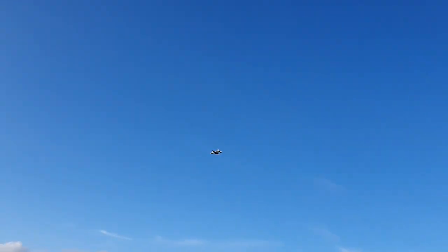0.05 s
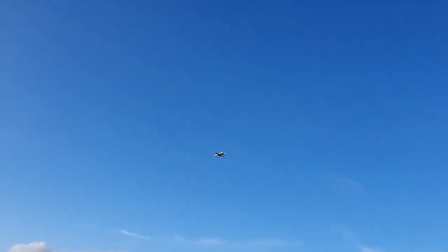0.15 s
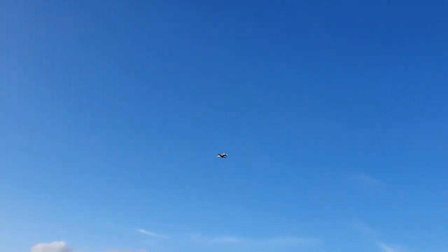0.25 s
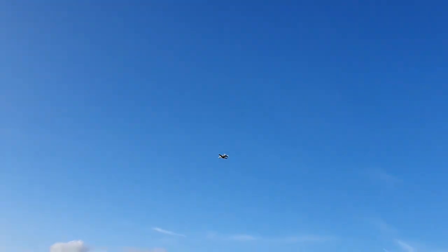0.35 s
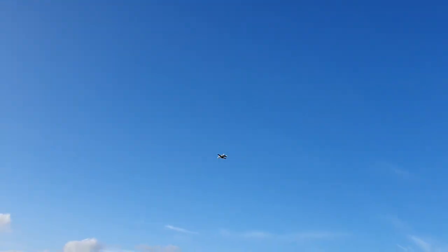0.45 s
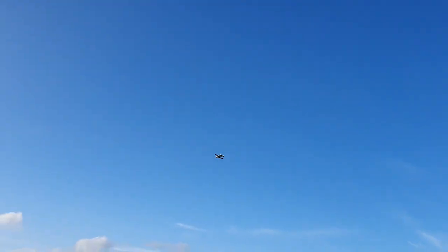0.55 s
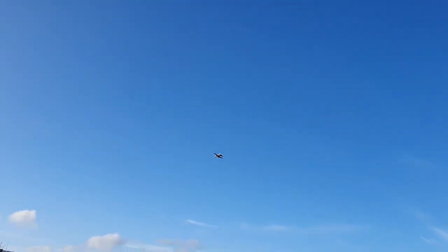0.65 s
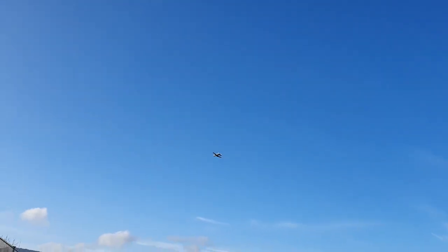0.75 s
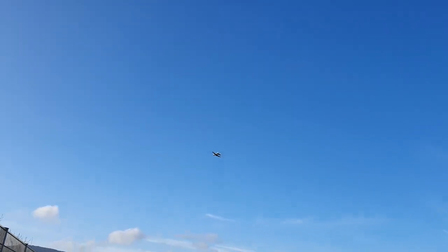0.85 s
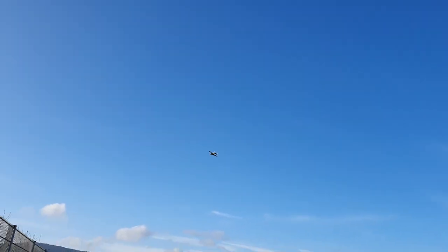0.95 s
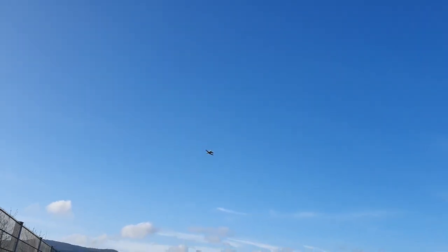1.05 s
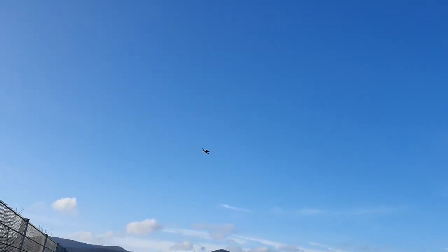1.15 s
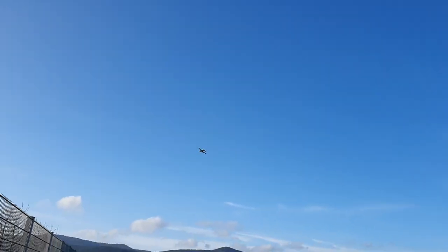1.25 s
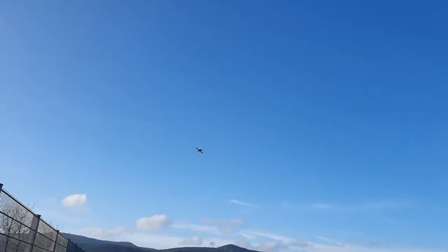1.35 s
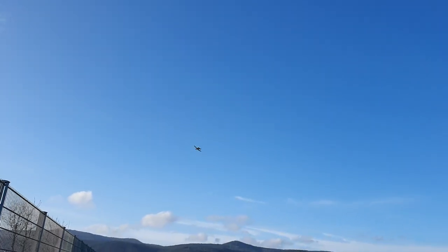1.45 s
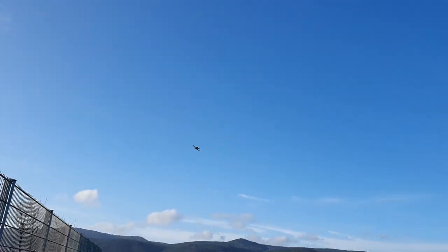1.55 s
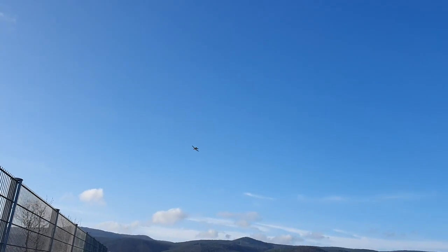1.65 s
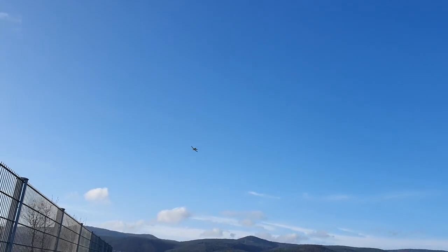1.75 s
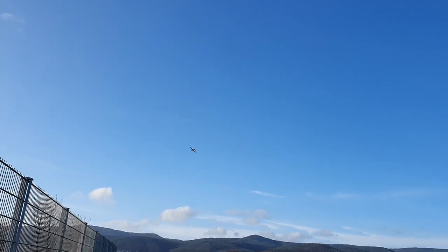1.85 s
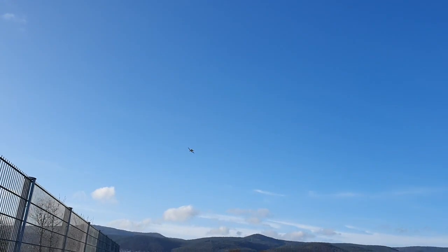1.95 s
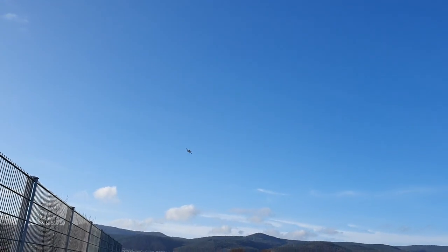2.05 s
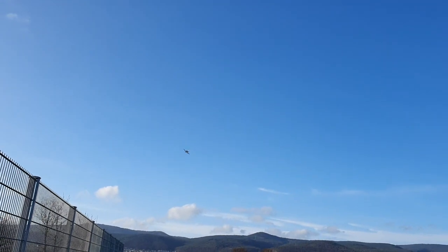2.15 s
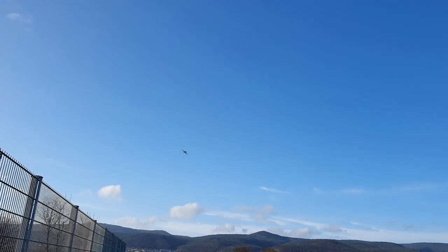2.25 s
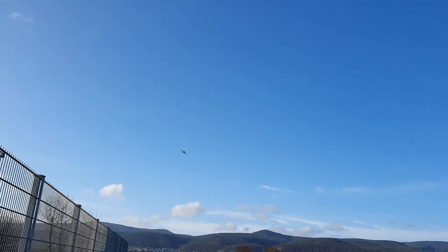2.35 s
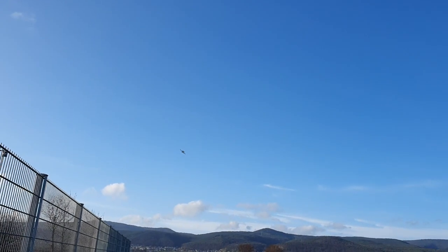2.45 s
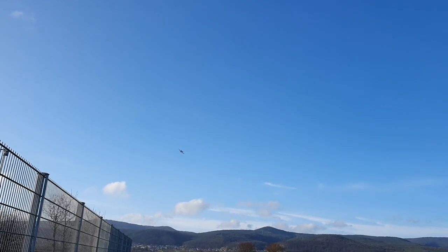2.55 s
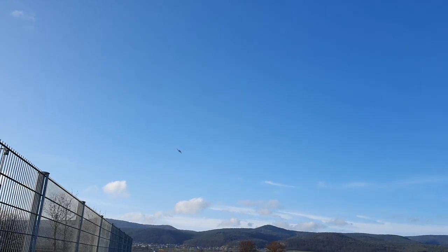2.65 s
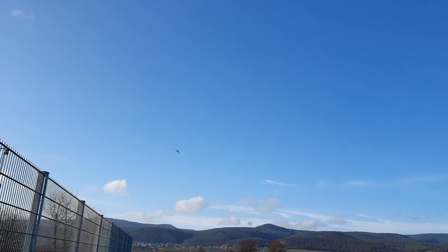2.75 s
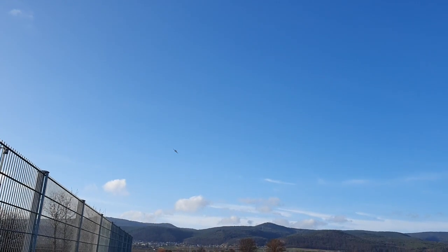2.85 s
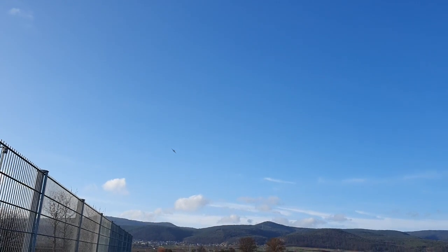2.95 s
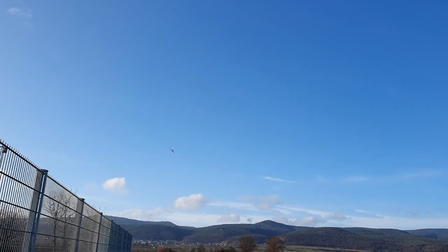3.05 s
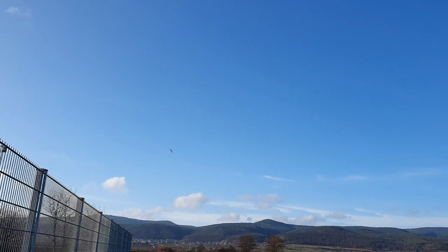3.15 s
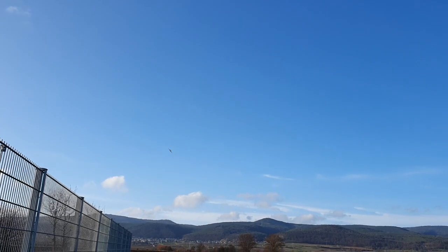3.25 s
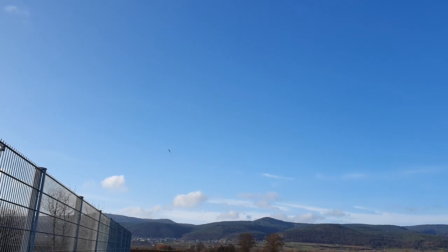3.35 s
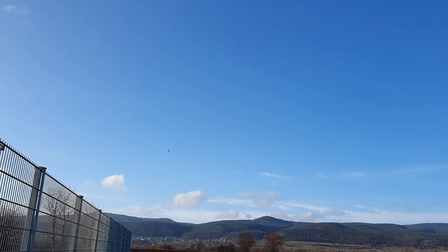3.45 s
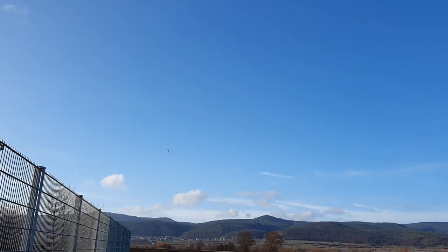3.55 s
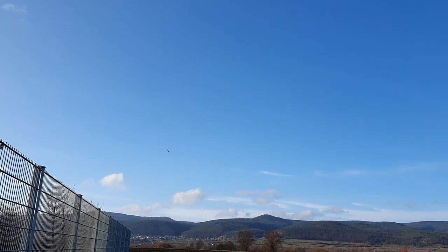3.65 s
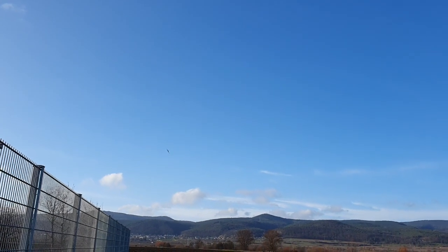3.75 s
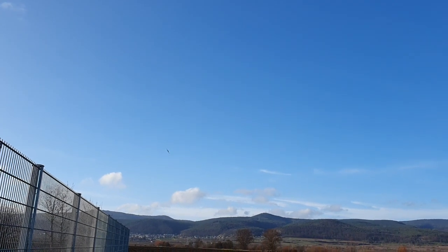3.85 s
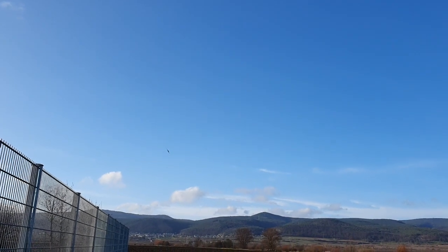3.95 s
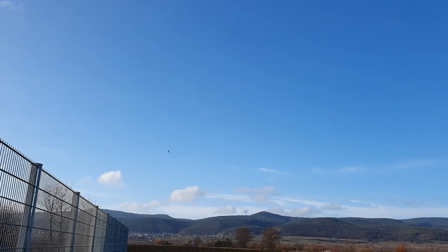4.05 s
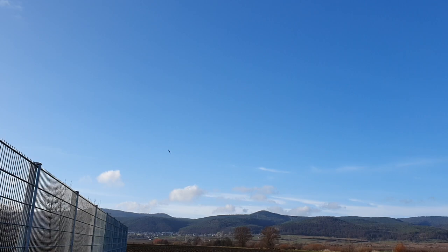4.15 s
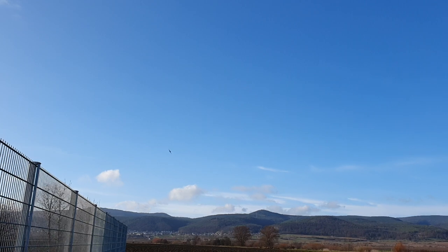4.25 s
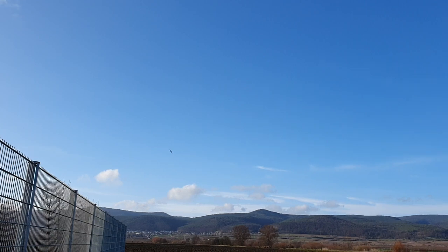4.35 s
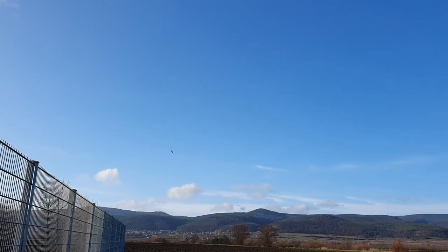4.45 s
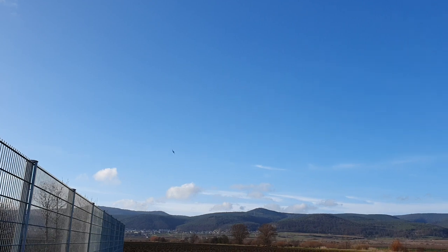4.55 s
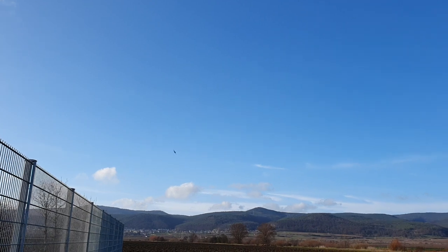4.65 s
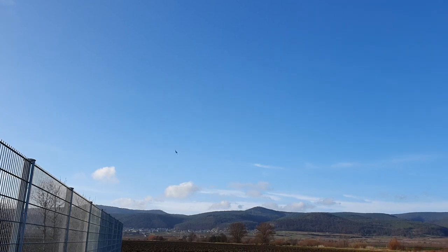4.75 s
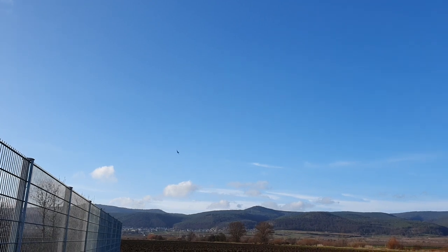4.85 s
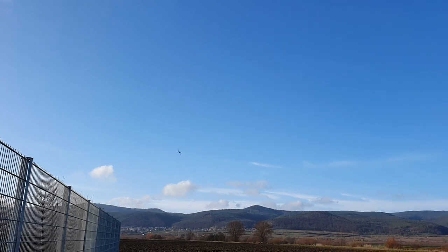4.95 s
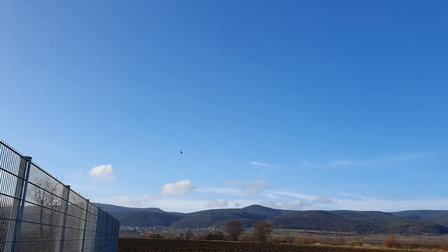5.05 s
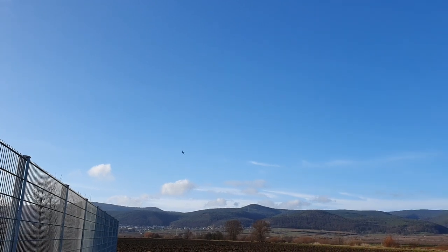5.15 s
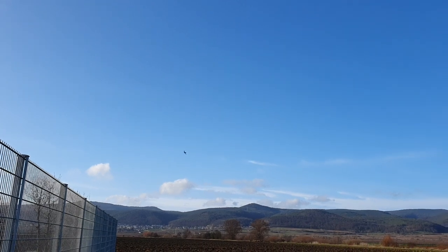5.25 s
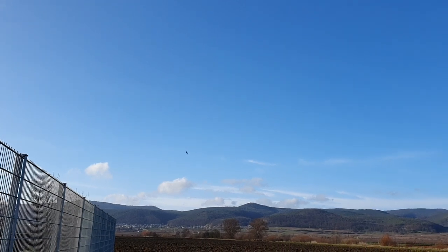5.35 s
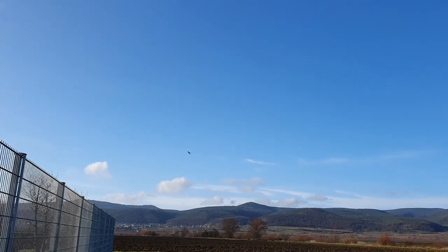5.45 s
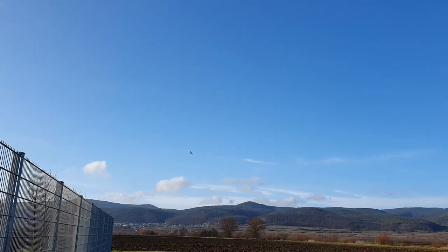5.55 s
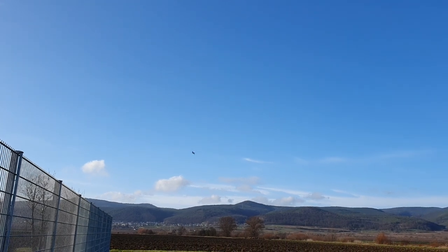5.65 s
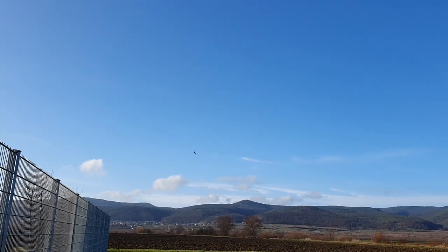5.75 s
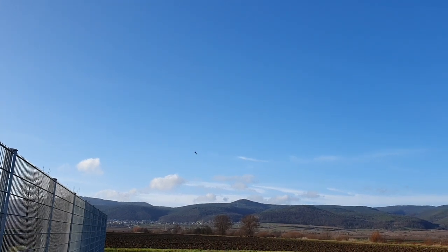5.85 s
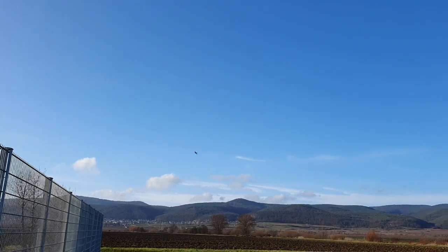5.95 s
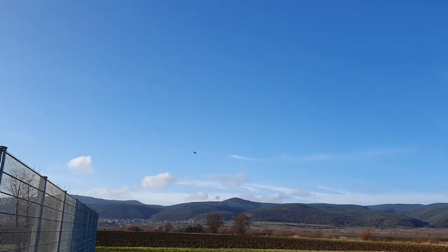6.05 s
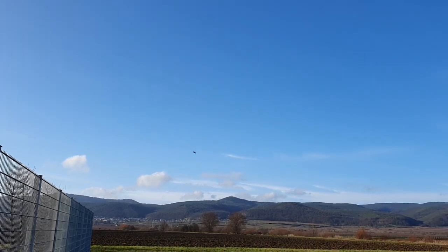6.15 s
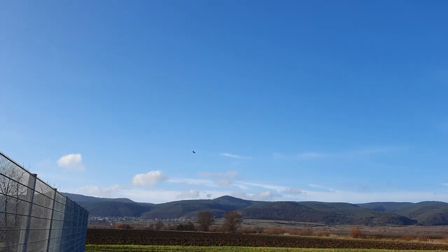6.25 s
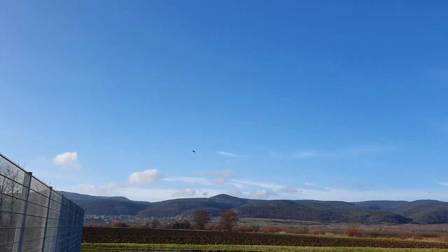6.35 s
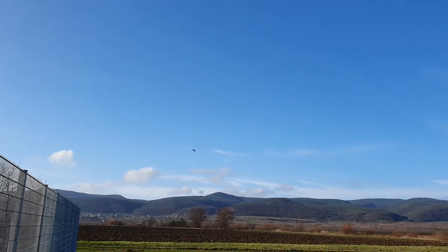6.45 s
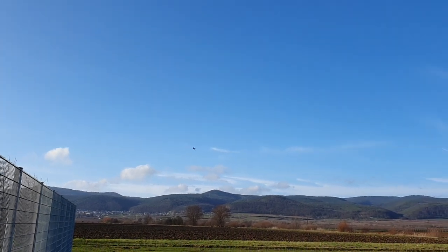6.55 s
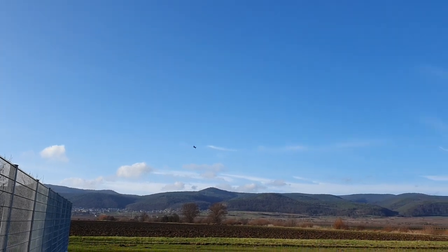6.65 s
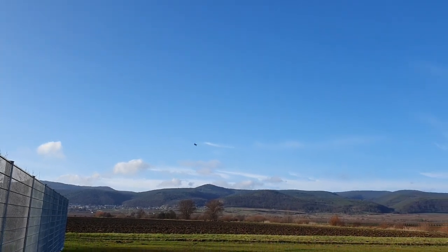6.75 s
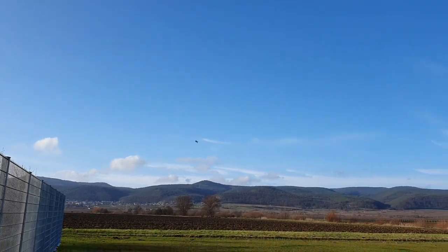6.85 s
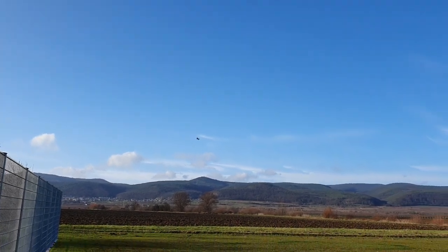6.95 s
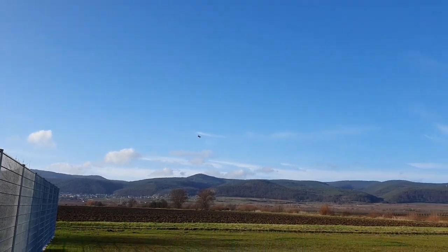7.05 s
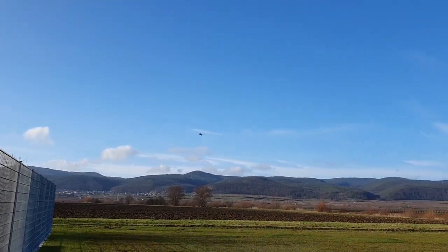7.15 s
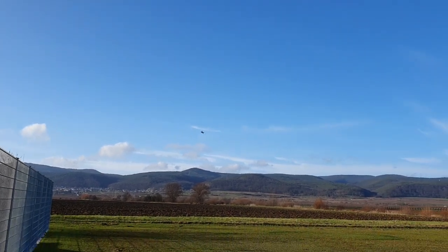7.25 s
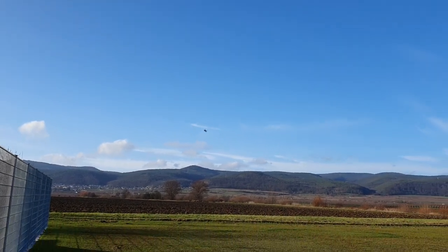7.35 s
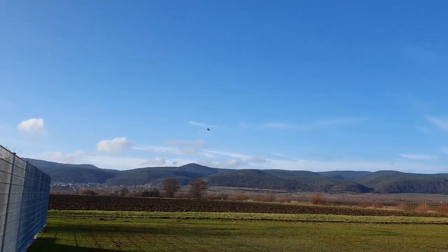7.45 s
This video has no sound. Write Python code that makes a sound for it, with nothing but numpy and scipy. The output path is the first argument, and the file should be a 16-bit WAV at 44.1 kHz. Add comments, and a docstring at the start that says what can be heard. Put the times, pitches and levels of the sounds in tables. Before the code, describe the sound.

From the start, a model jet's turbines make a hollow, rushing roar in the open air, loudest and brightest during the first second. As it flies away, a phasing tone sweeps steadily upward through the noise, quickly at first and then more slowly, while faint, narrow howls swell and sink. The hiss drains away between about 1 and 4 seconds, and the roar is dull and weaker by 5. It swells again from roughly 5.3 to 6.3 seconds, then recedes, with brief, thin whistling surges around 6.6 to 7.2, still audible at the end at 7.5.

Wind buffets the microphone throughout with a low rumble and short, irregular thumps. A sleeve swishes very softly close by, slightly to the right, from about 5.8 to 6.8 seconds. Underneath are a steady countryside hush and the faint, low hum of a distant engine.

```python
"""A hollow roar sweeps upward in pitch and dulls as a twin-turbine model jet flies away low over fields.
Its turbulent exhaust noise arrives directly and off the ground; the lag between the two shrinks, so their
interference comb rises, while the air absorbs the treble. Wind buffets the two microphone ports,
a sleeve swishes near the end, and a far engine hums in the hush of open country."""
import sys
import numpy as np
from scipy import signal
from scipy.fft import rfft, irfft, next_fast_len
from scipy.io import wavfile
from scipy.ndimage import uniform_filter1d, map_coordinates

SR = 44100
rng = np.random.default_rng(int(sys.argv[2]) if len(sys.argv) > 2 else 0)


def generate_wav(signal):
    """Clip the signal to [-1, 1] and save it as 16-bit WAV at the path in sys.argv[1]."""
    frames = np.transpose(np.atleast_2d(signal))
    scaled = np.clip(frames, -1, 1) * 32767
    pcm = np.round(scaled).astype(np.int16)
    wavfile.write(sys.argv[1], SR, pcm)


N = 331191
TIME = np.arange(N) / SR

# path differences set by the jet's bearing: time_s, left_port_lead_ms, holder_echo_lag_ms
BEARING = [(0, -.01, 1.24), (1, .008, 1.31), (2, .04, 1.35), (3, .07, 1.38), (4.5, .09, 1.41),
           (7.51, .095, 1.41)]


def jet():
    """Turbulent mixing radiates broadband noise, which reaches the ports directly and by scattering."""
    # exhaust spectrum: frequency_hz, relative_density_db
    exhaust_spectrum = [(130, -12), (300, -6), (400, -5.5), (490, -1.5), (620, -4), (850, -0.5), (1150, -5),
                        (1400, -2.5), (2200, -4.5), (2750, -16), (4400, -23), (5250, -24), (6400, -24.5),
                        (7600, -35.5), (11300, -38.5), (13500, -52.5), (15000, -67)]
    # scattering by the air and the field: frequency_hz, diffuse_to_direct_db
    scatter = [(200, -14), (500, -17), (1000, -15), (2350, -10.5), (2750, -2), (3100, 5), (3600, -3),
               (4400, -5), (5200, -2), (6100, -6.5), (7000, -4), (12000, 2)]
    exhaust = through_air(noise(exhaust_spectrum, channels=3))
    direct, diffuse = exhaust[:1], exhaust[1:]
    lead_ms = curves(BEARING)[0]
    pair = np.vstack([delayed(direct, -lead_ms / 2), delayed(direct, lead_ms / 2)])
    pair = pair + filtered(diffuse, lambda hz: amp(along(scatter, hz)))
    roar = receding(port_response(echoes(pair)))
    return howling(ground_bounce(roar)) * amp(-1.41 + 0.24 * wobble(14))


def through_air(x, knee_hz=5200, absorption_db_per_s=7.0, deepens_until_s=4.5):
    """Refraction by eddies focuses patches of noise; absorption above the knee grows with the path."""
    # focusing, strongest for short waves: frequency_hz, depth_db
    focusing = [(400, .8), (1400, 1.5), (4000, 2.6), (9000, 2)]
    hz, t, spectra = signal.stft(x, SR, nperseg=1024)
    eddies = uniform_filter1d(rng.standard_normal(spectra.shape[1:]), size=3, axis=0)
    eddies = unit(uniform_filter1d(eddies, size=8, axis=1))
    focus_db = along(focusing, hz)[:, None] * eddies
    above_knee = np.maximum(hz / knee_hz - 1, 0)[:, None]
    loss_db = absorption_db_per_s * above_knee * np.minimum(t, deepens_until_s)
    return signal.istft(spectra * amp(focus_db - loss_db), nperseg=1024)[1][:, :N]


def echoes(x, wing_share=0.11, holder_share=0.11):
    """Comb filtering: faint, very short reflections off the wing and camera holder colour the noise."""
    # reflection off the wing as the jet banks: time_s, lag_ms
    wing_echo = [(0, 0.46), (2.8, 0.47), (4.6, 0.4), (6, 0.56), (7, 0.856), (7.51, 0.72)]
    wing_ms = curves(wing_echo)[0]
    holder_ms = curves(BEARING)[1]
    x = x + wing_share * delayed(x, wing_ms)
    return x + holder_share * delayed(x, holder_ms)


def port_response(pair):
    """Resonance: the camera case lifts a few bands, and its two ports differ in level and phase."""
    # case resonances: centre_hz, width_hz, boost_db
    case_modes = [(1752, 80, 3), (3666, 550, 4.5), (4270, 260, 2), (7640, 600, 4)]
    # imbalance of the ports: frequency_hz, left_minus_right_db
    imbalance = [(120, -7.5), (380, 0), (700, -1.5), (1290, 3.5), (2380, 2), (4400, 1), (5800, -3.5),
                 (7500, 3.5), (11000, 3.5)]
    # phase shift from their unequal ringing: frequency_hz, left_lead_rad
    phase_lead = [(500, 0), (1050, .27), (1550, .1), (2000, -.72), (2800, -1.6), (3400, 1.1), (3900, .45),
                  (4400, -.45), (4850, -1.05), (5500, -.15), (6500, -.25), (7200, -1.2), (9000, -.9)]
    sides = [.5, -.5]
    case_db = lambda hz: sum(db * bump(hz, centre, width) for centre, width, db in case_modes)
    pair = filtered(pair, lambda hz: amp(case_db(hz) + np.outer(sides, along(imbalance, hz))))
    return filtered(pair, lambda hz: np.exp(1j * np.outer(sides, along(phase_lead, hz))))


def receding(pair, flutter_db=0.45):
    """Propagation loss: five registers fade at their own rates and flicker in the turbulent air."""
    # borders between the registers: frequency_hz
    splits_hz = [600, 1550, 3000, 6800]
    below = [filtered(pair, lambda hz: 1 / (1 + (hz / edge) ** 20)) for edge in splits_hz]
    registers = np.diff([np.zeros_like(pair), *below, pair], axis=0)
    return sum(steadied(band, size=SR // 5) * amp(db + flutter_db * wobble(45))
               for band, db in zip(registers, register_levels()))


def register_levels(rumble_fade_db_per_s=1.12):
    """Distance and directivity set each register's relative level in dB; the highest loses most."""
    # the exhaust as the jet recedes and turns: time_s, roar_db, treble_to_roar_db
    flight = [(0.0, -28, -9.5), (0.25, -28, -7), (0.7, -28.5, -5), (1.3, -30.5, -8.5), (1.7, -30.5, -11.5),
              (2.3, -31.5, -14.5), (2.63, -33.5, -14), (2.78, -33.5, -18), (3.0, -32.5, -20.5),
              (3.7, -33.5, -21), (4.2, -36, -17.5), (4.65, -36.5, -24), (5.18, -36, -25),
              (5.31, -33, -20.5), (5.6, -31.5, -19.5), (6.1, -32.5, -18.5), (6.55, -35, -17.5),
              (7.0, -39.5, -14), (7.3, -36.5, -23), (7.51, -38, -20)]
    # surges and dips of the upper mids: time_s, half_length_s, change_db
    surges = [(0.0, 0.066, -1), (0.308, 0.023, 4), (0.6, 0.04, 3), (1.084, 0.13, 3.5), (3.005, 0.25, -6.5),
              (4.116, 0.33, -8.5), (5.19, 0.019, -0.5), (6.6, 0.2, 3), (7.37, 0.05, 3)]
    # the very top, which distance takes first: time_s, sizzle_to_hiss_db
    sizzle = [(0, -12.5), (0.4, -20), (0.7, -18.5), (1.1, -19.5), (2.2, -16.5), (3, -21), (3.6, -25),
              (4.3, -28), (4.7, -37), (5.5, -31), (7.51, -31)]
    roar_db, treble_db = curves(flight)
    # the bass spreads all round, so it hardly follows the turn
    rumble_db = -33 - rumble_fade_db_per_s * TIME + 0.15 * (roar_db - roar_db.max())
    surge_db = sum(db * swell(s, half_s) for s, half_s, db in surges)
    rush_db = roar_db + 0.17 * treble_db + surge_db
    hiss_db = roar_db + treble_db
    sizzle_db = hiss_db + curves(sizzle)[0]
    return rumble_db, roar_db, rush_db, hiss_db, sizzle_db


def ground_bounce(x, split_hz=1650):
    """Two-path interference: the ground reflection cancels near odd multiples of half its inverse lag."""
    # comb spacing, rising as the lag shrinks: time_s, inverse_lag_hz
    comb_spacing = [(0, 209), (0.8, 256), (2.4, 339), (2.8, 353), (4, 376), (4.4, 391), (4.8, 414),
                    (6, 452), (7.51, 489)]
    # reflection off the soft field: frequency_hz, amplitude_share
    reflection = [(200, .7), (450, .8), (700, .9), (1200, .86), (2500, .62), (3500, .4), (5000, .3),
                  (10000, .09)]
    # phase of that reflection: frequency_hz, lag_rad
    phase_lag = [(200, .2), (500, .05), (950, .15), (1500, .33)]
    # what survives blurring by the air on the long grazing path: time_s, bass_share, treble_share
    coherence = [(0, 1, 1), (4.2, 1, 1), (5.2, .95, .66), (7.51, .82, .6)]
    lag_ms = 1000 / curves(comb_spacing)[0]
    bass_share, treble_share = curves(coherence)
    direct = filtered(x, lambda hz: 1 / np.hypot(1, along(reflection, hz)))
    bounce = filtered(direct, lambda hz: along(reflection, hz) * np.exp(-1j * along(phase_lag, hz)))
    bass = filtered(bounce, lambda hz: 1 / (1 + (hz / split_hz) ** 10))
    return direct + delayed(bass_share * bass + treble_share * (bounce - bass), lag_ms)


def howling(x):
    """Spectral peaks and notches give noise a pitch: narrow gliding bands swell and sink in the roar."""
    # howls: time_s, half_length_s, pitch_hz, glide_hz_per_s, half_width_hz, change_db
    howls = [(0.21, 0.15, 1070, 150, 35, 5), (0.624, 0.11, 1400, 0, 60, 9), (0.63, 0.03, 4600, 0, 400, 1.5),
             (0.57, 0.12, 3350, 900, 61, 3.5), (0.73, 0.17, 990, 197, 35, 3),
             (0.89, 0.13, 2230, 100, 90, 6), (1.214, 0.3, 1373, 200, 68, 8.5), (1.3, 0.08, 3900, 4, 350, 4),
             (1.304, 0.21, 1600, 150, 60, 4), (1.498, 0.28, 4200, 3, 130, 4),
             (1.82, 0.16, 2150, 400, 75, 6.5), (2.06, 0.06, 2250, 400, 70, 5.5),
             (1.9, 0.6, 644, -2, 38, 5.5), (1.78, 0.12, 770, 0, 40, 5), (2.3, 0.3, 1260, 100, 55, 6),
             (2.5, 0.14, 2300, 3, 70, 4), (2.6, 0.16, 2930, 351, 100, 8.5),
             (3.0, 0.45, 2390, -1.5, 90, 5.5), (3.2, 0.44, 840, 30, 44.7, 4), (3.4, 0.13, 3050, 0, 80, 7),
             (4.34, 1.4, 317, 20, 42, 3.5), (3.65, 0.3, 4270, 41.5, 89, 2.5),
             (3.7, 0.074, 1420, 29, 79, 6.5), (4.44, 0.2, 2830, 149.5, 100, 11.5),
             (4.4, 0.22, 3580, 0, 130, 7), (5.248, 0.22, 2200, 147, 80, 2.5),
             (5.75, 0.21, 860, 39.5, 49, 4), (5.95, 0.4, 1675, 42, 45, 2.5),
             (6.136, 0.3, 2810, -1, 80, 4.5), (6.69, 0.055, 3050, 0, 80, 14),
             (6.863, 0.38, 2380, 200, 102, 11.5), (6.642, 0.064, 3700, 0, 160, 5),
             (6.69, 0.06, 4800, 0, 350, 5), (6.9, 0.042, 3690, 0, 130, 11), (6.89, 0.03, 4750, 0, 250, 4),
             (6.97, 0.12, 2630, 1, 80, 13), (7.077, 0.05, 4550, 1500, 200, 6),
             (7.14, 0.11, 3400, 1, 150, 7.5), (6.8, 0.6, 1413, 20, 70, 4), (7.33, 0.11, 1410, 0, 65, 3.5)]
    # hollows: the same columns
    hollows = [(0.26, 0.18, 5100, 0, 200, -8), (2.1, 0.57, 5400, 147, 250, -6),
               (3.0, 0.4, 675, 29.5, 36, -1.5), (0.1, 0.25, 440, 0, 28, -3), (2.5, 0.2, 1200, 301, 70, -3),
               (4.75, 0.2, 485, 1, 45, -5.5), (5.3, 1.8, 5300, 1, 380, -3),
               (5.8, 0.44, 2300, 48.5, 73, -1.5), (7.4, 0.14, 2760, 0, 210, -8),
               (4.7, 0.57, 1580, 99.5, 90, -5.5), (5.401, 1.03, 1009, 38, 53, -14),
               (4.57, 0.18, 1230, 0, 54, -5), (8.2, 0.12, 1700, 0, 45, -7), (1.48, 0.15, 550, 0, 30, -4),
               (1.6, 0.17, 3060, 0, 100, -7.5), (2.8, 0.2, 3260, 0, 77, -8),
               (6.37, 0.29, 2180, -8, 120, -12), (6.1, 0.2, 3130, 3, 120, -8),
               (6.92, 0.087, 4600, 11000, 250, -6), (7.05, 0.1, 1860, 0, 150, -8.5)]
    hz, t, spectra = signal.stft(x, SR, nperseg=1024)
    change_db = 0
    for s, half_s, pitch_hz, glide, half_width_hz, db in howls + hollows:
        band = swell(pitch_hz + glide * (t - s), half_width_hz, hz[:, None])
        change_db = change_db + db * swell(s, half_s, t) * band
    return signal.istft(spectra * amp(change_db), nperseg=1024)[1][:, :N]


def wind(shared=0.57, breeze_db=-44.5, lull_db=5, rms_to_peak_db=-5.5):
    """Turbulent pressure fluctuations buffet the two ports, partly in step, in a breeze with gusts."""
    # pressure spectrum: frequency_hz, relative_density_db
    buffet_spectrum = [(13, -50.5), (22, -35.5), (54, 3.5), (103, -0.5), (127, -18), (141, -5.5),
                       (168, -24), (200, -15), (260, -49), (440, -120)]
    # gusts: time_s, peak_db, left_minus_right_db, half_length_s
    gusts = [(0.21, -28, 2, 0.022), (0.38, -44, 24, 0.018), (0.98, -28, 4, 0.025), (1.28, -39, 0, 0.018),
             (1.476, -33, -4, 0.017), (1.897, -31, 1, 0.015), (1.95, -27, 4, 0.016), (2.003, -28, 1, 0.015),
             (2.08, -35, -13, 0.043), (2.445, -33, 10, 0.02), (2.52, -31, -5, 0.032),
             (2.616, -28.5, -17, 0.019), (2.737, -36, 11, 0.031), (3.228, -29.5, -6, 0.035),
             (3.425, -26, -1, 0.026), (3.527, -31, -3, 0.03), (3.698, -28.5, 5, 0.035),
             (3.93, -34, 0, 0.018), (3.993, -28.5, 2, 0.018), (4.138, -36.5, 10, 0.067),
             (4.567, -28.5, 0, 0.017), (5.305, -30.5, -1, 0.023), (5.531, -26, 0, 0.027),
             (5.67, -29, 3, 0.025), (6.021, -36, 0, 0.015), (6.63, -34.5, -9, 0.041),
             (6.88, -42, -3, 0.014), (6.983, -34, 4, 0.015), (7.094, -31, 5, 0.018),
             (7.215, -35.5, 6, 0.032), (7.37, -33, -6, 0.02), (7.504, -21.5, 0, 0.022)]
    # calms in the breeze: time_s, half_length_s, change_db
    calms = [(0.8, 0.065, -4), (2.29, 0.029, -1), (2.952, 0.04, -3.5), (4.468, 0.024, -14),
             (4.77, 0.089, -1.5), (5.18, 0.015, -8)]
    pressure = noise(buffet_spectrum, channels=3)
    pair = steadied(pressure[:2] + shared * pressure[2], size=SR // 12)
    lulls = np.minimum([wobble(19), wobble(17)], 0)
    calm_db = sum(db * swell(s, half_s) for s, half_s, db in calms)
    breeze_gain = amp(breeze_db + lull_db * lulls + calm_db) * panned(side_db=-8)
    gust_gain = sum(amp(db + rms_to_peak_db) * swell(s, half_s) * panned(side_db)
                    for s, db, side_db, half_s in gusts)
    return pair * np.hypot(breeze_gain, gust_gain)


def sleeve():
    """Sliding friction: smooth fabric swishes close to the right port as the camera turns."""
    # friction spectrum: frequency_hz, relative_density_db
    cloth_spectrum = [(1500, -20), (4000, 3), (7000, 1), (11000, -2.5), (14000, -8), (16000, -22)]
    # strokes of cloth on cloth: time_s, half_length_s, gain_db, lower_edge_hz, left_minus_right_db
    strokes = [(5.9, 0.073, -60.5, 2000, -2), (6.227, 0.2, -61, 2000, -3), (6.547, 0.28, -66, 2000, -3),
               (7.39, 0.033, -66, 10500, -12)]
    cloth = noise(cloth_spectrum, channels=2) * amp(1.7 * wobble(28))
    swishes = 0
    for s, half_s, db, edge_hz, side_db in strokes:
        hiss = filtered(cloth, lambda hz: 1 - 1 / (1 + (hz / edge_hz) ** 10))
        swishes = swishes + amp(db) * swell(s, half_s) * panned(side_db) * hiss
    return swishes


def far_engine(start_hz=55.8, rise_hz_per_s=0.375):
    """Harmonics of rotation: only the lowest orders of a slowly quickening shaft carry over the field."""
    # hum partials: shaft_order, level_db
    partials = [(1, -61), (2, -47), (3, -56)]
    shaft_hz = start_hz + rise_hz_per_s * TIME
    turns = np.cumsum(shaft_hz * (1 + 0.0033 * wobble(4.76))) / SR
    return sum(amp(db + 2.44 * wobble(8.0)) * unit(np.sin(2 * np.pi * order * turns))
               for order, db in partials)


def country_hush(level_db=-47.5):
    """Diffuse ambient noise: a steady hush, uncorrelated between the ports."""
    # open-air spectrum: frequency_hz, relative_density_db
    hush_spectrum = [(100, -4.5), (1000, 5.5), (4000, -15), (8000, -44.5), (16000, -38.5)]
    return amp(level_db) * noise(hush_spectrum, channels=2)


def amp(db):
    """Decibels to amplitude gain."""
    return 10 ** (np.asarray(db) / 20)


def unit(x):
    """Scale to rms 1."""
    return x / np.sqrt(np.mean(x ** 2) + 1e-20)


def steadied(pair, size):
    """Hold the mean of both channels at rms 1 over size samples."""
    return pair / np.sqrt(np.abs(uniform_filter1d(pair.mean(0) ** 2, size=size)) + 1e-20)


def panned(side_db):
    """Channel gains for a level difference, left minus right."""
    return amp([[side_db / 2], [-side_db / 2]])


def along(points, hz):
    """Interpolate (frequency_hz, value) points on a log axis."""
    knots_hz, values = np.transpose(points)
    return np.interp(np.log(hz + 1), np.log(knots_hz + 1), values)


def curves(rows):
    """Interpolate each column after the time to one value per sample."""
    times, *columns = np.transpose(rows)
    return [np.interp(TIME, times, column) for column in columns]


def wobble(rate):
    """A smooth random curve, rate knots a second."""
    return map_coordinates(rng.standard_normal(int(N * rate / SR) + 4), [TIME * rate])


def swell(centre, half_width, axis=TIME):
    """A Gaussian bell of height 1."""
    return np.exp(-((axis - centre) / half_width) ** 2 / 2)


def bump(hz, centre_hz, width_hz):
    """A Lorentzian resonance curve of height 1."""
    return 1 / (1 + (2 * (hz - centre_hz) / width_hz) ** 2)


def noise(spectrum, channels):
    """Uncorrelated noises of rms 1 with a given spectrum."""
    size = next_fast_len(N, True)
    colour = amp(along(spectrum, np.fft.rfftfreq(size, 1 / SR)))
    white = rng.standard_normal((channels, size))
    return unit(irfft(rfft(white) * colour, size)[:, :N])


def filtered(x, response):
    """Apply a frequency response to x, with its ends continued smoothly."""
    margin = SR // 8
    padded = np.pad(x, [(0, 0)] * (x.ndim - 1) + [(margin, margin)], mode="reflect", reflect_type="odd")
    size = next_fast_len(N + 2 * margin, True)
    spectrum = rfft(padded, size) * response(np.fft.rfftfreq(size, 1 / SR))
    return irfft(spectrum, size)[..., margin:margin + N]


def delayed(x, ms):
    """Every row of x after a varying travel time."""
    place = np.arange(N) - ms * SR / 1000
    return np.array([map_coordinates(row, [place], mode="mirror") for row in x])


def scene():
    """Superposition: the jet over wind, cloth and the quiet of open country."""
    return jet() + wind() + sleeve() + far_engine() + country_hush()


def record(dry):
    """Band limiting: a steep low-pass removes the very top; the sound starts and stops softly."""
    top_hz, fade_s = 15650, .006
    ramp = np.minimum(np.minimum(TIME, TIME[-1] - TIME) / fade_s, 1)
    return filtered(dry * np.sin(ramp * np.pi / 2) ** 2, lambda hz: 1 / (1 + (hz / top_hz) ** 200))


dry = scene()
out = record(dry)
generate_wav(out)
```